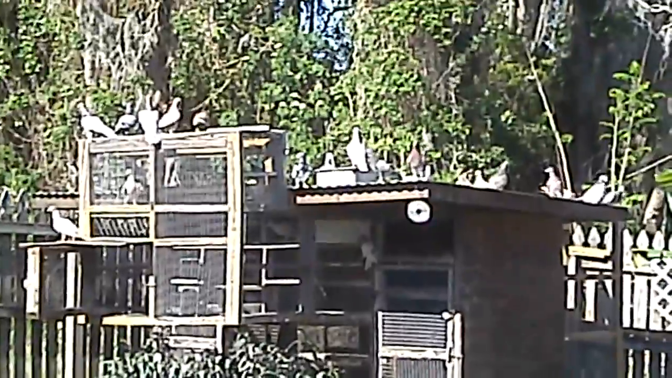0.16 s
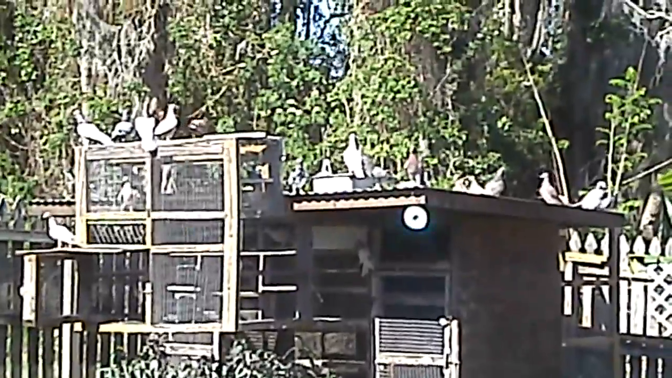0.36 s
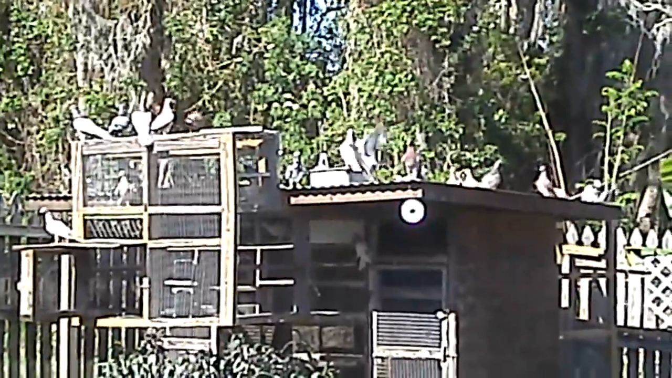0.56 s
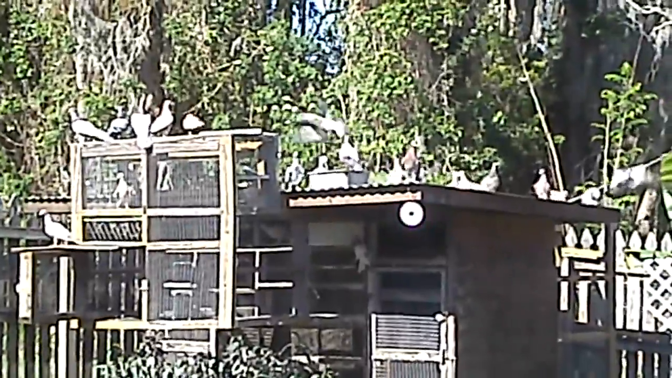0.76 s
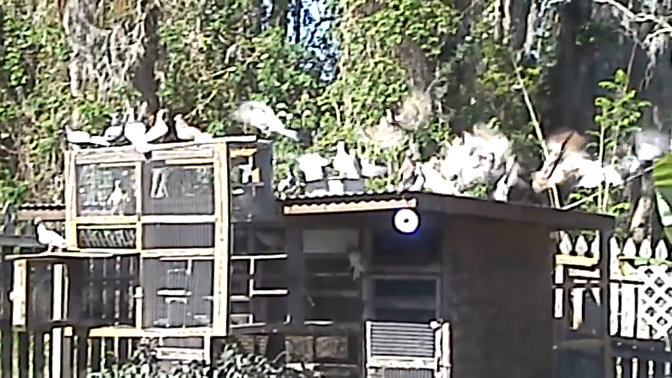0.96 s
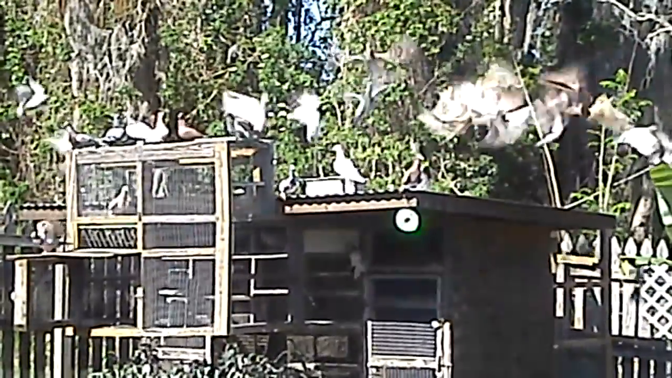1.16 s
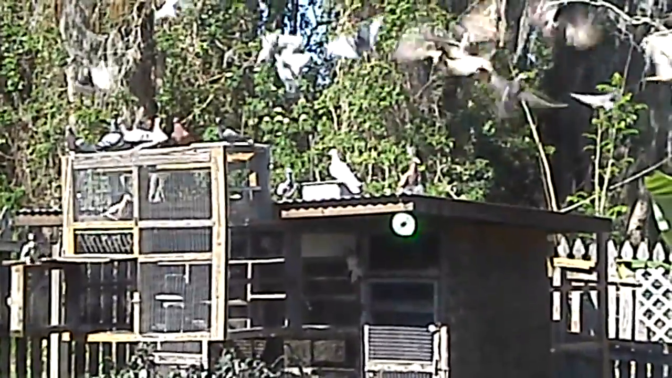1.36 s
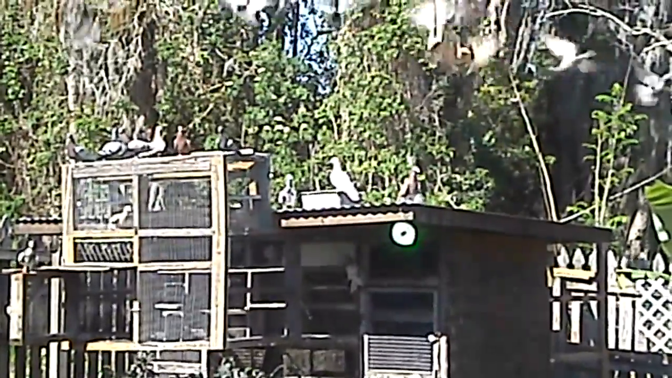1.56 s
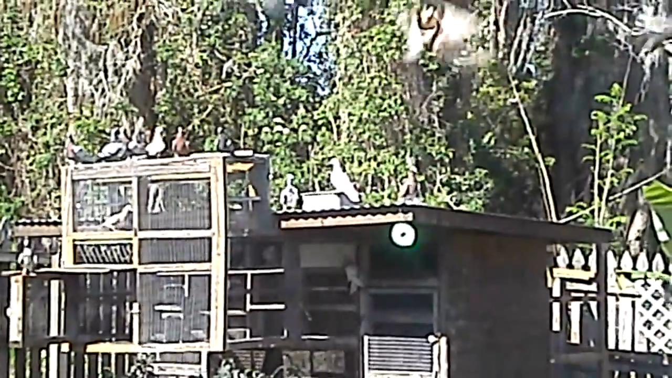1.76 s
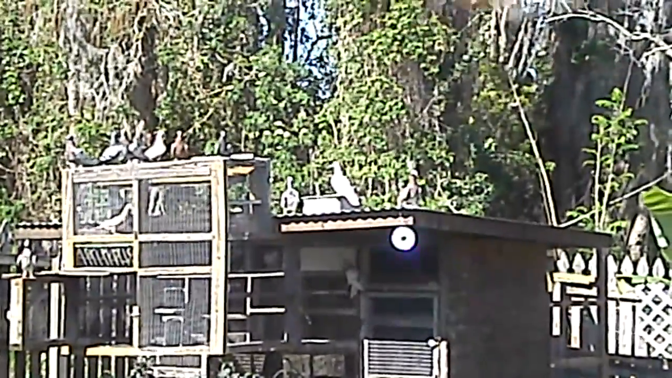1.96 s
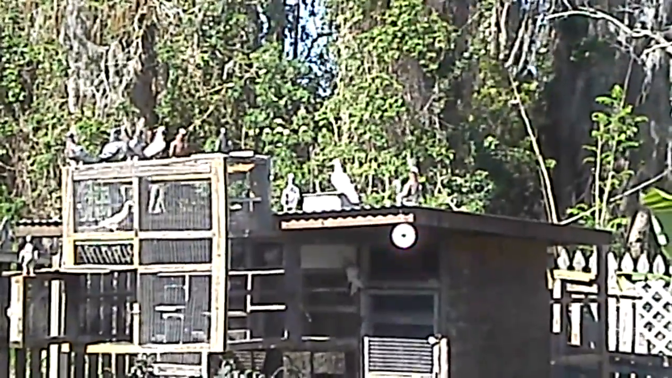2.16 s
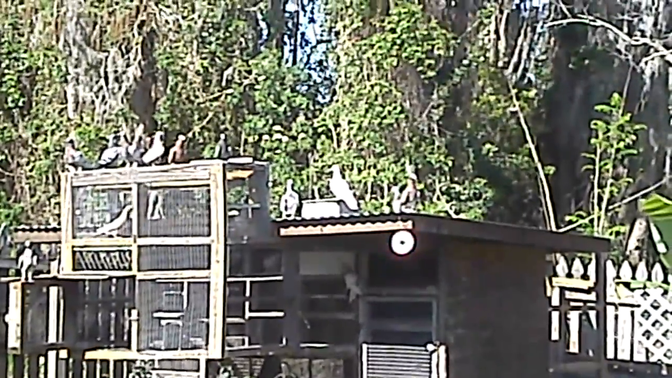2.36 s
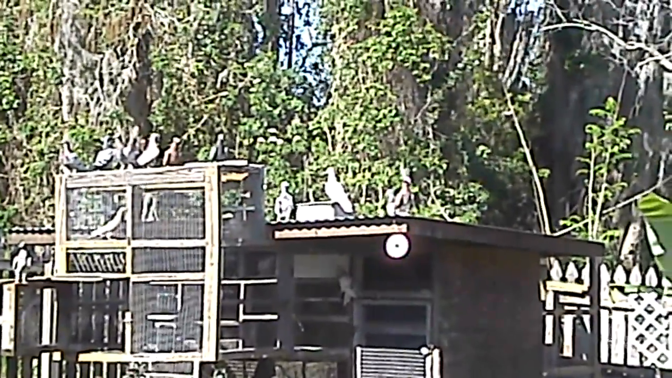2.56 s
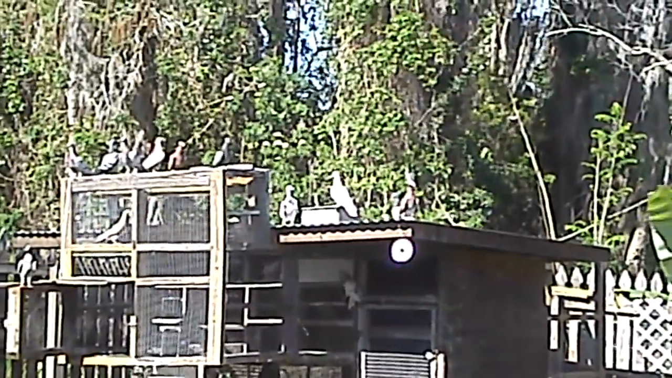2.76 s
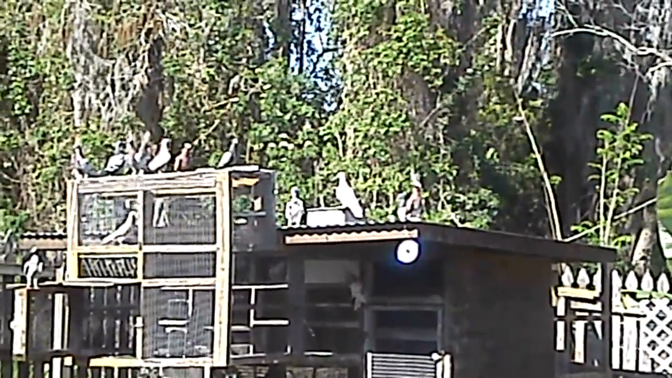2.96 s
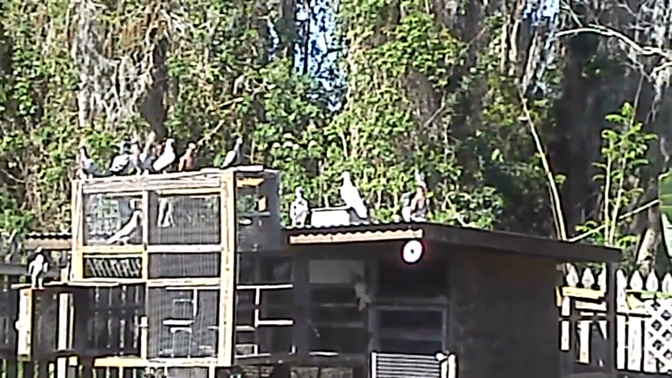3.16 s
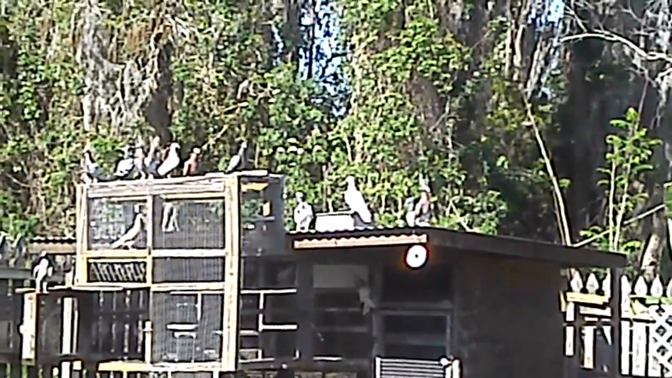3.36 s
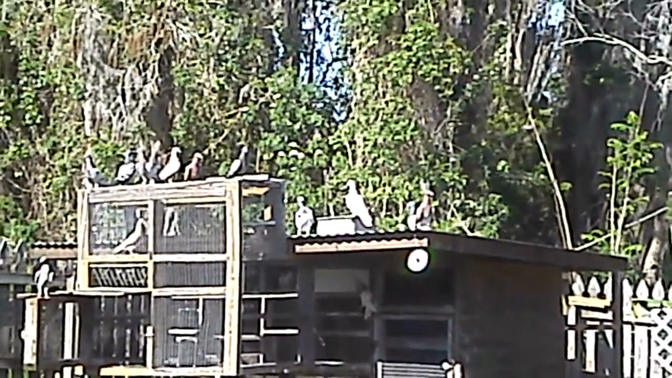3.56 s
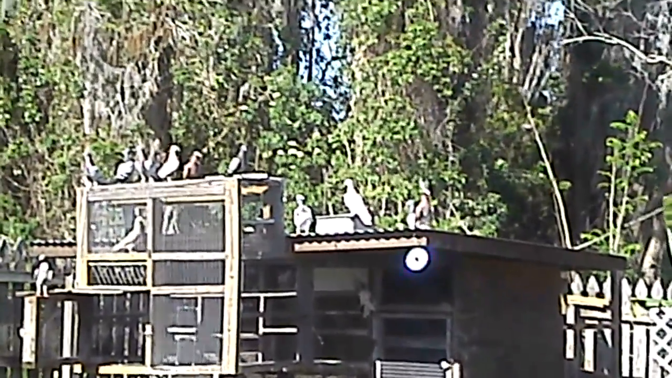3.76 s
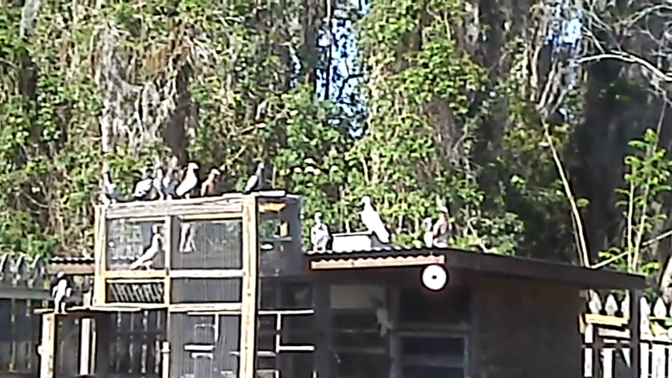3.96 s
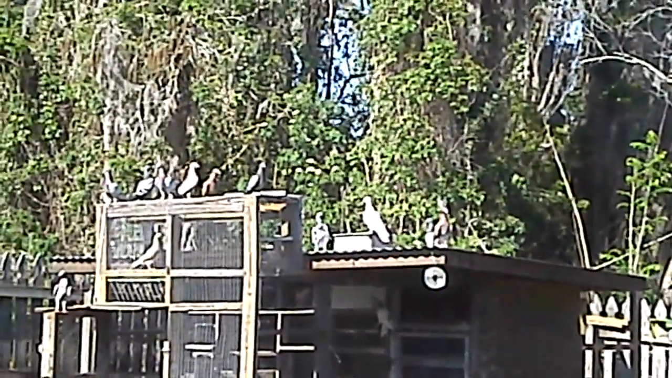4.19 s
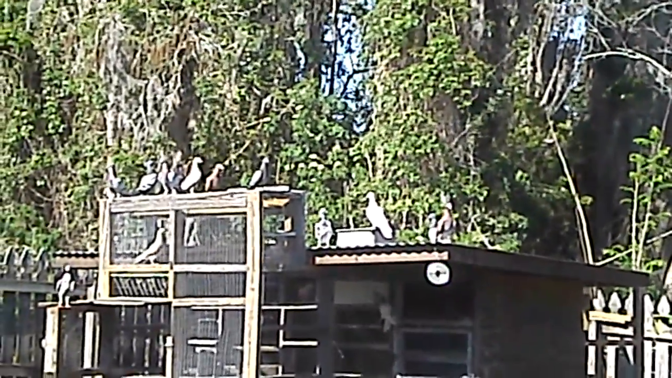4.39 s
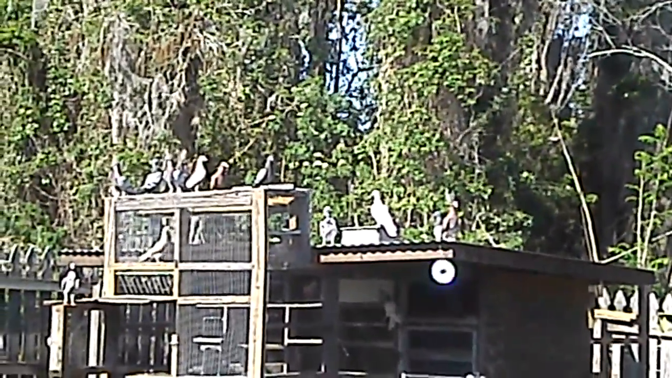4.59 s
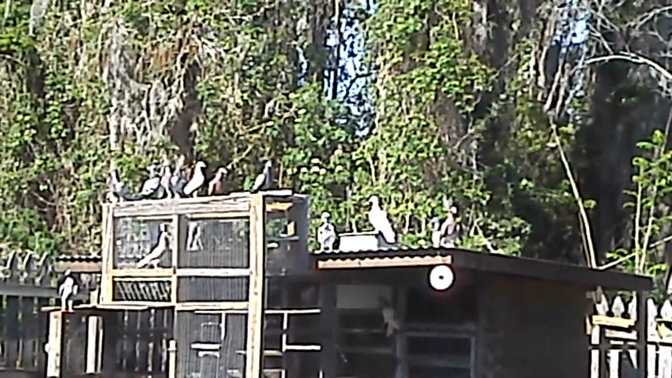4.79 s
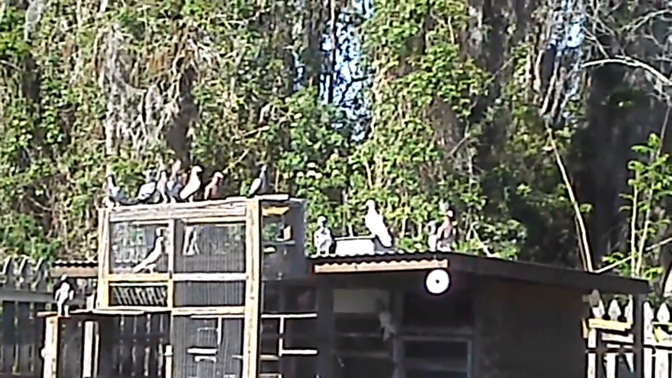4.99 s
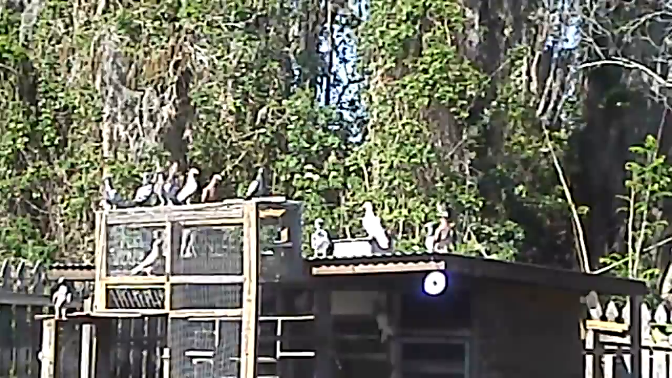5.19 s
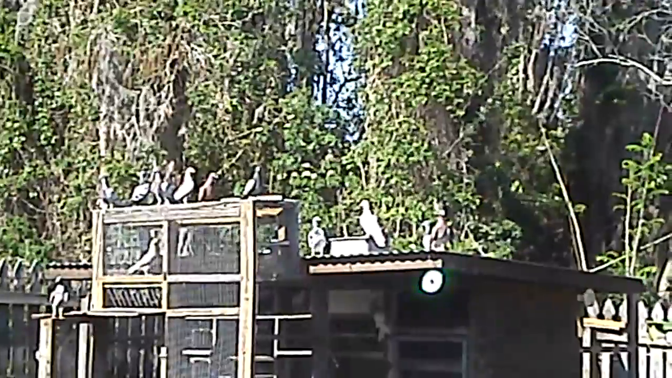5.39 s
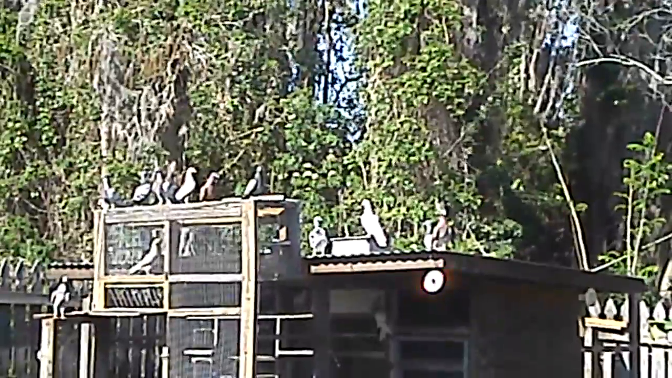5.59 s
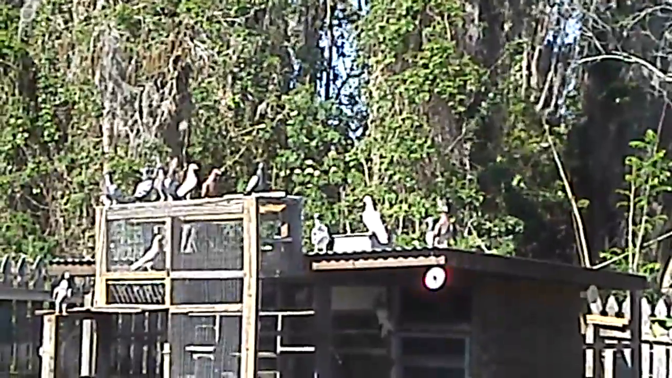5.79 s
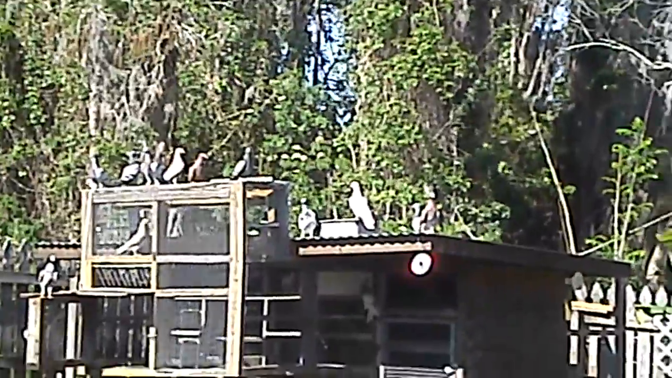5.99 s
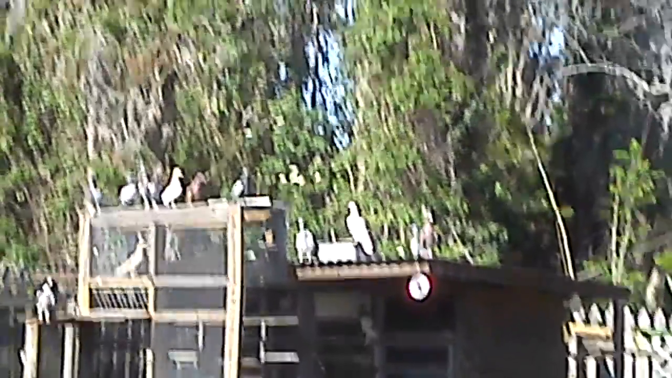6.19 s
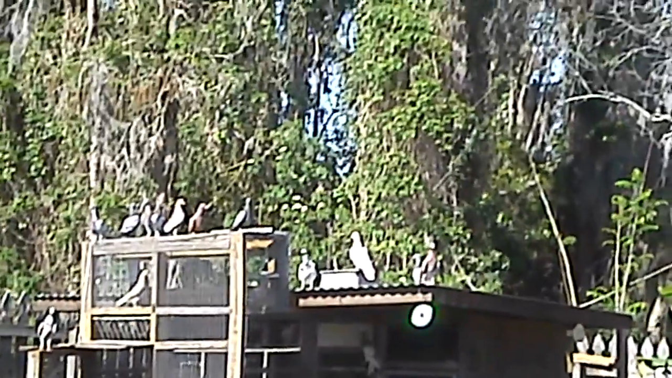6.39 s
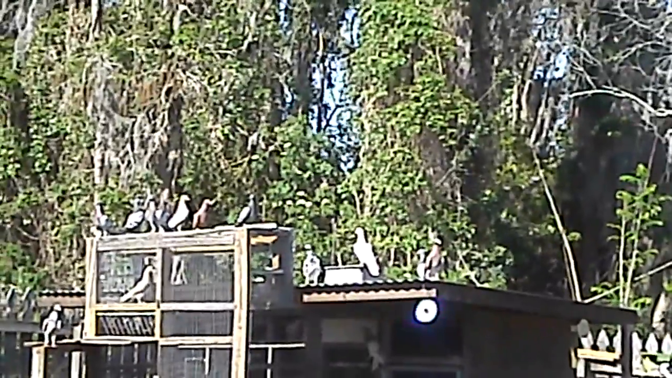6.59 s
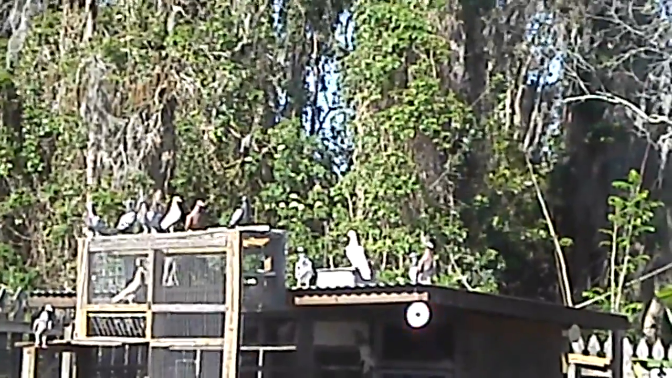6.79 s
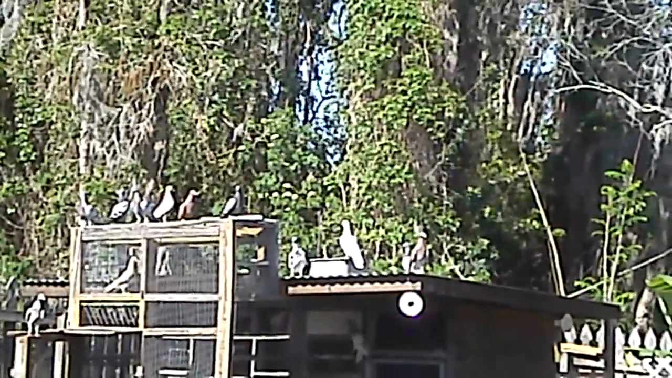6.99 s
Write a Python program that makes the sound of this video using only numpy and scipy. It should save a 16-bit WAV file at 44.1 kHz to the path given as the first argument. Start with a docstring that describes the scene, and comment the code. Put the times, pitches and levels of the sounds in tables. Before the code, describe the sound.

After one short coo, pigeons burst into flight, wings clapping and rustling, then circle with faint feather whistles over a distant engine.

```python
"""A pigeon flock bursts off a garden loft after one bird's coo, a rolled, then held throat tone.
Wing tips clap, downstrokes whoosh, feathers rub and rustle. The birds circle away and pass again,
their fluttering flight feathers whistling softly. A far engine drones under the hush of the yard.
A dull, grainy 8-bit recorder picks it up and overloads on the loudest claps."""
import sys
import numpy as np
from scipy import signal
from scipy.fft import rfft, irfft
from scipy.io import wavfile
from scipy.ndimage import uniform_filter1d

SR = 44100
rng = np.random.default_rng(int(sys.argv[2]) if len(sys.argv) > 2 else 0)


def to_wav(sig):
    """Store sig (one row per channel, or 1-D mono) as 16-bit WAV at the path in sys.argv[1].

    Samples outside -1..1 are clipped; the rate is SR.
    """
    pcm = np.clip(np.atleast_2d(sig), -1, 1) * 32767
    pcm = np.round(pcm).astype(np.int16)
    wavfile.write(sys.argv[1], SR, pcm.T)  # frames by channels


N = 310464
TIME = np.arange(N) / SR


def from_db(db):
    return 10 ** (np.asarray(db) / 20)


def unit_rms(x):
    return x / np.sqrt(np.mean(x ** 2) + 1e-20)


def curves(rows):
    """Columns of a table of (seconds, values..), interpolated to every sample."""
    times_s, *columns = np.transpose(rows)
    return [np.interp(TIME, times_s, column) for column in columns]


def since(start_s):
    """Seconds elapsed; zero before the start."""
    return np.maximum(TIME - start_s, 0)


def gate(start_s, end_s, fade_s):
    """One from start to end, linear fades outside."""
    return np.interp(TIME, [start_s - fade_s, start_s, end_s, end_s + fade_s], [0, 1, 1, 0])


def swell(centre_s, width_s):
    """Bell of given half-height width: sample indices, seconds from centre, height."""
    first, last = int((centre_s - 2 * width_s) * SR), int((centre_s + 2 * width_s) * SR)
    at = np.arange(max(0, first), min(N, last))
    t = at / SR - centre_s
    return at, t, 2 ** -(2 * t / width_s) ** 2


def band(x, low_hz, high_hz, order=2):
    return signal.sosfilt(signal.butter(order, [low_hz, high_hz], "band", fs=SR, output="sos"), x)


def colour(x, spectrum):
    """Filter by (Hz, relative dB) points; rms 1."""
    hz, db = np.transpose(spectrum)
    log_hz = np.log(np.arange(N // 2 + 1) * SR / N + 1)
    gain = from_db(np.interp(log_hz, np.log(hz), db))
    return unit_rms(irfft(rfft(x) * gain, N))


def noise(spectrum):
    return colour(rng.standard_normal(N), spectrum)


def drift(rate_hz):
    """Smooth random wander; rms 1."""
    hz = np.arange(N // 2 + 1) * SR / N
    return unit_rms(irfft(rfft(rng.standard_normal(N)) / (1 + (hz / rate_hz) ** 2), N))


# Background spectrum. Each row: frequency in Hz, relative level in dB.
YARD_SPECTRUM = [(25, -1.5), (40, -3.5), (120, -3.5), (200, -6.5), (330, 0), (500, -4), (700, -4),
                 (1200, -7), (2200, -11.5), (4800, -20)]


def yard_hush(level_db=-51):
    """Steady, dull outdoor noise."""
    return from_db(level_db) * noise(YARD_SPECTRUM)


# Engine speeding up, then slowing. Each row: time in seconds, turning rate in Hz, gain in dB.
ENGINE_RUN = [(0, 28.32, -4), (1.3, 29.65, -1), (2.3, 31.8, 6), (3.2, 32.87, 1.5), (3.9, 32.38, 4),
              (4.25, 33.77, -3.5), (5.1, 33.42, 4), (5.7, 33.15, -3.5), (6.4, 30.72, -8), (7, 30.43, -7.5)]
# Engine tones. Each row: multiple of the turning rate, rms level in dB before that gain.
ENGINE_ORDERS = [(5, -62), (7, -66), (8, -61.5), (9, -63.5), (10, -60), (11, -68.5)]


def far_engine(wander=.0027, fading_db=2):
    """Harmonics of the turning rate, each fading in and out on its way through the trees."""
    turn_hz, gain_db = curves(ENGINE_RUN)
    phase = 2 * np.pi * np.cumsum(turn_hz * (1 + wander * drift(2.3))) / SR
    drone = sum(from_db(db + fading_db * drift(2.6)) * np.sin(order * phase)
                for order, db in ENGINE_ORDERS)
    return from_db(gain_db) * np.sqrt(2) * drone


def held_note(start_s=.3, accent_s=.44, end_s=.497, held_hz=382, jitter=.036, shimmer_db=2.5):
    """The coo's end swells on one pitch to an accent, then sinks and dies; returns tone, envelope."""
    fall_hz_per_s, swell_db_per_s, fade_db_per_s = 1200, 64.5, 100
    hz = held_hz - fall_hz_per_s * since(accent_s - .015)
    level_db = -27 - swell_db_per_s * np.maximum(accent_s - TIME, 0) - fade_db_per_s * since(accent_s)
    at, _, accent = swell(accent_s, width_s=.02)
    level_db[at] += 5 * accent
    envelope = from_db(level_db + shimmer_db * drift(44.3)) * gate(start_s, end_s, fade_s=.022)
    phase = 2 * np.pi * np.cumsum(hz * (1 + jitter * drift(60))) / SR
    return envelope * (np.sin(phase) + from_db(-22) * np.sin(2 * phase)), envelope


# Throat pulses opening the coo. Each row: centre in seconds, relative level in dB, pitch in Hz.
COO_PULSES = [(.007, -26.5, 370), (.064, -25, 350), (.119, -24, 384), (.155, -26.5, 392),
              (.183, -21.5, 363.5), (.218, -32, 405)]


def coo(voice_gain_db=-2.5, rasp_gain_db=-11, rasp_lag_s=.01):
    """A raspy throat tone: rolled in pulses, each with a softer, higher rebound, then held."""
    voice, envelope = held_note()
    for pulse_s, pulse_db, pulse_hz in COO_PULSES:
        pulse = (pulse_s, pulse_db, pulse_hz, .012)
        rebound = (pulse_s + .017, pulse_db - 10.5, 441, .022)
        for centre_s, db, hz, width_s in pulse, rebound:
            at, t, bell = swell(centre_s, width_s)
            voice[at] += from_db(db) * bell * np.sin(2 * np.pi * hz * t)
            envelope[at] += from_db(db) * bell
    rasp = noise([(100, -13), (450, 2.5), (850, -2.5), (1050, -6), (1350, -6.5), (1900, -12),
                  (2600, -12.5), (3200, -8.5), (4800, -32)])
    rasp_envelope = np.interp(TIME - rasp_lag_s, TIME, uniform_filter1d(envelope, size=2200))
    return from_db(voice_gain_db) * voice + from_db(rasp_gain_db) * rasp_envelope * rasp


# Wing claps. Each row: start in seconds, relative level in dB, air-pocket pitch in Hz,
# contact time in seconds.
WING_CLAPS = [(.518, -45, 2100, 0.0032), (0.888, -35, 3460, 0.0061), (0.97, -22, 3000, .008),
              (1.061, -19.5, 2920, 0.0052), (1.329, -21, 705, 0.0059), (1.425, -21, 1300, 0.0033),
              (1.5725, -16.5, 3370, 0.0054), (1.6275, -16, 3060, 0.0055), (1.696, -12.5, 1280, 0.0068),
              (1.742, -19, 3600, 0.0058), (1.785, -19, 1665, 0.0057), (1.81, -14, 3010, 0.0091),
              (1.892, -15, 3400, 0.0051), (1.9198, -14, 3350, 0.0094), (1.955, -21.5, 1380, .007),
              (2.045, -17, 1290, .005), (2.06, -17, 3170, .005), (2.107, -20, 1296, .005),
              (2.138, -18.5, 1047, 0.0071), (2.194, -17.5, 1215, 0.0051), (2.2212, -16, 3460, .012),
              (2.253, -13.5, 2680, 0.0057), (2.267, -18.5, 1320, 0.0043), (2.3004, -18, 3180, 0.0054),
              (2.356, -14, 1190, 0.0057), (2.385, -14, 2128, .005), (2.4045, -11.5, 1270, .005),
              (2.477, -13, 1750, 0.0061), (2.487, -16.5, 2190, 0.0054), (2.499, -18.5, 2690, .006),
              (2.546, -23, 780, .006), (2.6, -17.5, 3270, 0.0058), (2.618, -11.5, 3190, 0.0052),
              (2.722, -10.5, 1410, 0.0068), (2.745, -14.5, 2040, .007), (2.83, -18, 2470, 0.0083),
              (2.9418, -15.5, 2780, 0.0057), (3.0454, -7, 2400, .007), (3.058, -20.5, 1740, .004),
              (3.159, -10, 773, 0.0062), (3.2798, -11, 880, 0.0035), (3.317, -26, 670, 0.0052),
              (3.625, -41.5, 2000, .008), (3.87, -41.5, 1070, 0.0044), (4.6533, -32.5, 1785, 0.0053)]


def wing_claps(rise_s=.00089, ring_s=.0022, hollow_db_per_octave=2.6, ragged_db=2.5, gain_db=2.28):
    """Wing tips meet: the quills crack and the air squeezed between them rings."""
    out, size = np.zeros(N), 2048
    t = TIME[:size]
    quills = noise([(40, -30.5), (200, -18), (500, -11.5), (800, 0), (1300, 2), (2200, -.5),
                    (3500, 3), (4000, 0), (4800, -2.5), (5500, -31)])
    touches = from_db(ragged_db * np.clip(drift(560), -1.5, 1.5))   # quills land one after another
    for start_s, db, pocket_hz, contact_s in WING_CLAPS:
        at = round(start_s * SR) + np.arange(size)
        # Deeply cupped wings trap more air: a lower, hollower knock.
        pocket_db = -1.5 + hollow_db_per_octave * max(0, np.log2(2000 / pocket_hz))
        pocket = unit_rms(band(rng.standard_normal(size), pocket_hz / 1.05, pocket_hz * 1.085))
        crack = quills[at] + from_db(pocket_db) * pocket
        crack /= np.sqrt(uniform_filter1d(crack ** 2, size=90))   # force alone sets the loudness
        contact = np.minimum(t / rise_s, 1) * np.exp(-np.maximum(t - contact_s, 0) / ring_s)
        force = contact * touches[at]
        force *= np.linalg.norm(contact) / np.linalg.norm(force)
        out[at] += from_db(db + gain_db) * crack * force
    return out


# Spectra of wing-driven air and rubbing feathers. Each row: frequency in Hz, relative level in dB.
WHOOSH_SPECTRUM = [(60, -20), (190, -21.5), (320, -1.5), (520, -2), (720, 4.5), (980, -0.5), (1280, 3),
                   (1700, -13), (3000, -28.5), (4800, -20), (5500, -48)]
RUSTLE_SPECTRUM = [(300, -28), (600, -17), (1300, -6), (1900, -3.5), (2600, 0.5), (3400, 0.5), (4000, -3),
                   (4800, -4.5), (5500, -33)]


def clap_rushes(lag_s=.04, width_s=.05, base_db=-29.5, db_per_clap_db=.5, rustle_gain_db=-4.5):
    """The wings sweep down after a clap: the harder the clap, the stronger the whoosh and rustle."""
    power = np.zeros(N)
    for start_s, clap_db, _, _ in WING_CLAPS:
        at, _, bell = swell(start_s + lag_s, width_s)
        power[at] += (from_db(base_db + db_per_clap_db * clap_db) * bell) ** 2
    return np.sqrt(power) * (noise(WHOOSH_SPECTRUM) + from_db(rustle_gain_db) * noise(RUSTLE_SPECTRUM))


# Flight-feather flutter. Each row: harmonic number, relative level in dB.
FEATHER_HARMONICS = [(1, -5), (2, -5), (3, -2.5), (4, -15), (5, -21)]


def feather_whistle(hz, favoured=2, falloff_db=0):
    """A fluttering feather; harmonics lose falloff_db per step from the favoured one; rms 1."""
    phase = 2 * np.pi * np.cumsum(hz) / SR
    tone = np.zeros(len(hz))
    for harmonic, db in FEATHER_HARMONICS:
        level = from_db(db - falloff_db * abs(harmonic - favoured))
        tone += level * np.sin(harmonic * phase + rng.uniform(0, 2 * np.pi))
    return unit_rms(tone)


def slap_power(per_s=60, decay_s=.0027, spread_db=4):
    """Power envelope of small, sudden wing slaps at random moments; mean 1."""
    hits = rng.random(N) < per_s / SR
    strength = from_db(spread_db * np.clip(rng.standard_normal(N), -2, 2))
    power = signal.lfilter([1], [1, -np.exp(-1 / (decay_s * SR))], hits * strength ** 2 + 1e-18)
    return power / np.mean(power)


# The flock bursts up and leaves. Each row: time in seconds, whoosh gain in dB, rustle gain in dB.
TAKEOFF = [(.86, -41, -50), (.93, -36.5, -43), (0.991, -25.5, -28.5), (1.42, -27.5, -32.5),
           (1.53, -31, -32), (1.95, -28.5, -24.5), (2.52, -29.5, -32.5), (2.89, -37.5, -40),
           (3.001, -32, -35), (3.26, -41, -50), (3.45, -38, -40.5)]


def flock_takeoff(birds=12, beats_per_s=8.7, stroke_s=.04, whistle_gain_db=-6, air_gain_db=-2):
    """Each bird beats at its own pace; downstrokes push air, flutter one feather and rub the rest."""
    push, whistles = np.zeros(N), np.zeros(N)
    waver = 1 + .02 * drift(81)
    for pace, offset_beats, bird_hz in rng.uniform([.85, 0, 640], [1.15, 1, 780], (birds, 3)):
        for beat in range(6, 40):
            at, t, bell = swell((beat + offset_beats) / (beats_per_s * pace), stroke_s)
            bend_octaves = rng.normal(0, .068) + rng.normal(0, 1.5) * t
            push[at] += bell ** 2
            whistles[at] += bell * feather_whistle(bird_hz * waver[at] * 2 ** bend_octaves)
    mean_push = uniform_filter1d(push, size=SR // 10) + .019
    strokes, slaps = push / mean_push, slap_power()
    air = np.sqrt(.75 * strokes + .25 * slaps) * noise(WHOOSH_SPECTRUM)
    air += from_db(whistle_gain_db) * whistles / np.sqrt(mean_push)
    # Feathers rub in tiny clumped snaps.
    snaps = rng.standard_normal(N) * from_db(1.5 * np.clip(drift(450), -2, 2))
    rustle = np.sqrt((strokes + slaps) / 2) * colour(snaps, RUSTLE_SPECTRUM)
    air_db, rustle_db = curves(TAKEOFF)
    wings = from_db(air_db + air_gain_db) * air + from_db(rustle_db) * rustle
    return wings * gate(TAKEOFF[0][0], TAKEOFF[-1][0], fade_s=.052)


# Spectrum of distant wings. Each row: frequency in Hz, relative level in dB.
FAR_WHOOSH_SPECTRUM = [(60, -9.5), (200, -1), (320, 10), (500, 4), (750, 6), (1000, -0.5), (1350, 3),
                       (1800, -5.5), (2800, -2), (3500, -4.5), (4800, -14.5), (5500, -42.5)]
# Whistle as the birds leave, circle and return. Each row: time in seconds, pitch in Hz,
# glide within a stroke in octaves per second, favoured harmonic number.
WHISTLE_COURSE = [(3.2, 745, -2, 1), (3.46, 684, -2.2, 1.5), (4.6, 709, 2, 1.8), (4.86, 732.6, 1.1, 2.5),
                  (5.25, 724.6, 1.5, 2.5), (5.39, 755, 2, 1.08), (5.89, 711, 0, 1.1), (6.7, 655, -1.5, 1.7),
                  (6.94, 680, -1, 1.5)]
# Downstrokes. Each row: centre in seconds, whoosh level in dB, relative whistle level in dB.
DOWNSTROKES = [(3.005, -40, -38), (3.205, -40, -36.5), (3.322, -42, -39), (3.385, -38.5, -48.5),
               (3.44, -36, -32), (3.645, -46.5, -59), (3.752, -39, -44), (3.88, -43, -56),
               (4.055, -44, -51.5), (4.482, -53, -53), (4.6, -42.5, -51), (4.69, -45.5, -51),
               (4.868, -44, -47), (5.002, -42, -43.5), (5.13, -42.5, -45), (5.2, -48.5, -58.5),
               (5.255, -51.5, -52), (5.387, -41.5, -43), (5.497, -46, -48.5), (5.615, -61.5, -55.5),
               (5.752, -50, -51.5), (5.887, -43.5, -48.5), (6.02, -51.5, -54.5), (6.165, -52, -59),
               (6.692, -46.5, -52.5), (6.83, -51, -52), (6.939, -39, -41)]


def wingbeats(stroke_s=.046, lead_s=.008, arch_octaves=.023, whistle_gain_db=1, rasp_depth_db=3):
    """Single downstrokes: a rasping feather whistle arches in pitch just ahead of a whoosh."""
    out, air = np.zeros(N), noise(FAR_WHOOSH_SPECTRUM)
    waver = 1 + .0105 * drift(120)
    rasp = unit_rms(from_db(rasp_depth_db * drift(200)))
    course = curves(WHISTLE_COURSE)
    for centre_s, whoosh_db, whistle_db in DOWNSTROKES:
        at, _, bell = swell(centre_s, stroke_s)
        out[at] += from_db(whoosh_db) * bell * air[at]
        hz, glide, favoured = (column[round(centre_s * SR)] for column in course)
        at, t, bell = swell(centre_s - lead_s, stroke_s)
        bend_octaves = glide * t - arch_octaves * (2 * t / stroke_s) ** 2
        whistle = feather_whistle(hz * waver[at] * 2 ** bend_octaves, favoured, falloff_db=4.5)
        out[at] += from_db(whistle_db + whistle_gain_db) * bell * rasp[at] * whistle
    return out


# Thumps on loud claps. Each row: centre in seconds, level in dB.
LOW_THUMPS = [(3.046, -21.5), (3.163, -36.5)]


def low_thumps(width_s=.0028):
    """A short, low thump on two of the loudest claps, as the recorder overloads."""
    out = np.zeros(N)
    for centre_s, db in LOW_THUMPS:
        at, t, bell = swell(centre_s, width_s)
        out[at] += from_db(db) * bell * (1 - 2 * t / width_s)
    return out


def flock_retreat(start_s=3.62, end_s=4.1, gain_db=-43.5, fade_db_per_s=14.5):
    """The flock's whoosh from beyond the trees, fading with distance."""
    whoosh = band(noise(FAR_WHOOSH_SPECTRUM), 90, 2300, order=1)
    envelope = from_db(gain_db - fade_db_per_s * since(start_s)) * gate(start_s, end_s, fade_s=.03)
    return envelope * whoosh


# Echoes off ground, loft and fence. Each row: delay in seconds, gain in dB.
ECHOES = [(0.016, -18.5), (0.04, -24), (0.061, -36)]


def garden(x, t60_s=.45, onset_s=.0068, scatter_db=-18.5):
    """Adds a few hard echoes and a dull scatter from the trees."""
    t = TIME[:SR]
    envelope = from_db(-60 * t / t60_s) * np.minimum(t / onset_s, 1)
    tail = band(rng.standard_normal(SR), 340, 3200, order=1) * envelope
    response = from_db(scatter_db) * tail / np.linalg.norm(tail)
    for delay_s, db in ECHOES:
        response[round(delay_s * SR)] += from_db(db)
    return x + signal.fftconvolve(x, response)[:N]


def scene():
    """Pigeons and background, heard at one spot; mono."""
    echoing = garden(wing_claps() + coo() + wingbeats())
    direct = low_thumps() + clap_rushes() + flock_takeoff() + flock_retreat()
    return (echoing + direct + far_engine() + yard_hush())[None]


# The recorder's smoothing filter. Each row: frequency in Hz, gain in dB.
SMOOTHING = [(0, 0), (3500, 0), (4000, -7), (4700, -16), (5050, -80), (SR / 2, -120)]


def record(dry, decimation=4, steps=128, ceiling=.92, cutoff_hz=15762):
    """Quarter-rate 8-bit recorder: quiet sound turns grainy, the loudest claps clip."""
    low_rate = signal.resample_poly(dry, 1, decimation, axis=-1)
    quantised = np.floor(steps * np.clip(low_rate, -1, 1)) / steps
    hz, db = np.transpose(SMOOTHING)
    taps = signal.firwin2(255, hz, from_db(db), fs=SR)
    smoothed = signal.resample_poly(quantised, decimation, 1, axis=-1, window=taps)[:, :N]
    lowpass = signal.cheby2(12, 70, cutoff_hz, fs=SR, output="sos")
    return signal.sosfilt(lowpass, np.clip(smoothed, -ceiling, ceiling))


dry = scene()
out = record(dry)
to_wav(out)
```